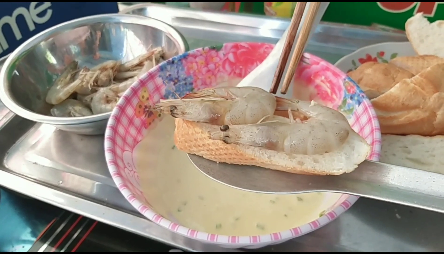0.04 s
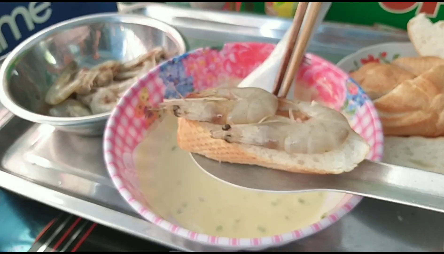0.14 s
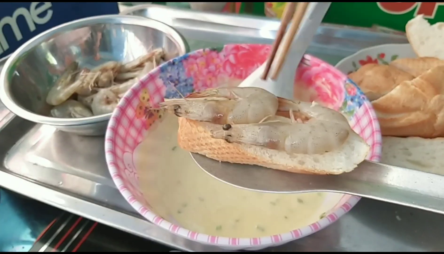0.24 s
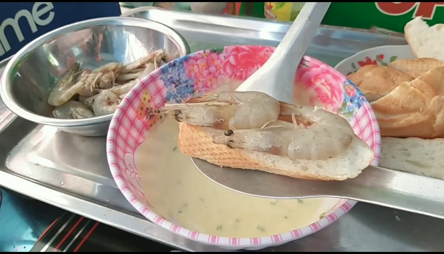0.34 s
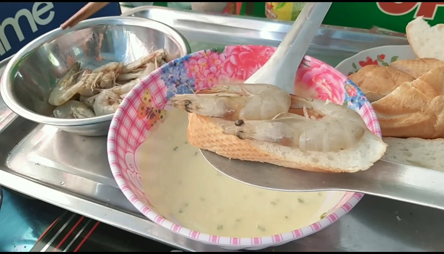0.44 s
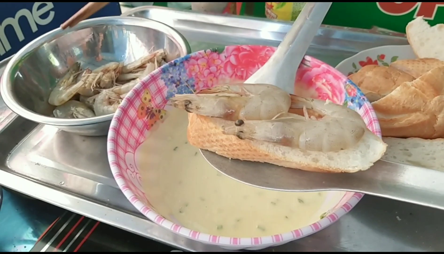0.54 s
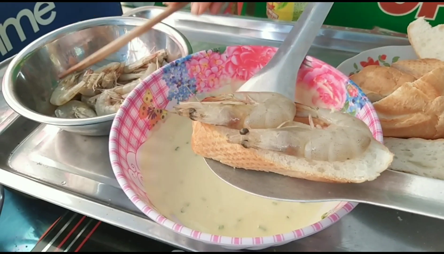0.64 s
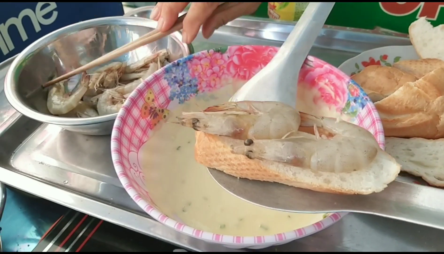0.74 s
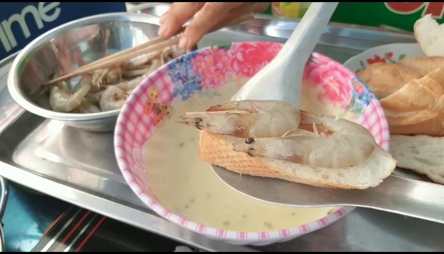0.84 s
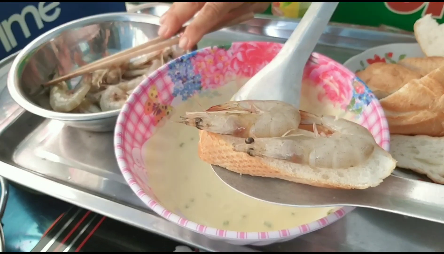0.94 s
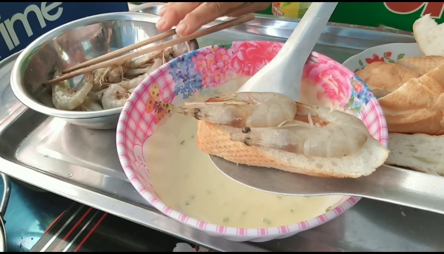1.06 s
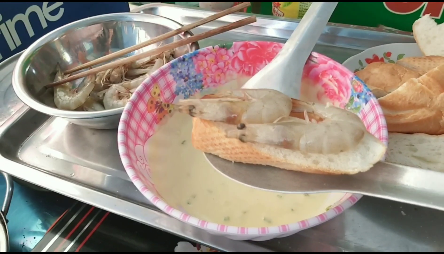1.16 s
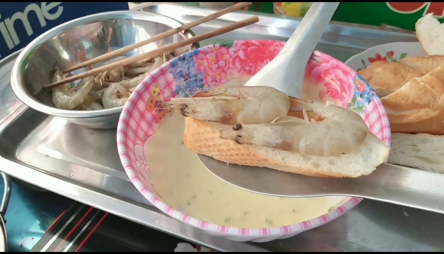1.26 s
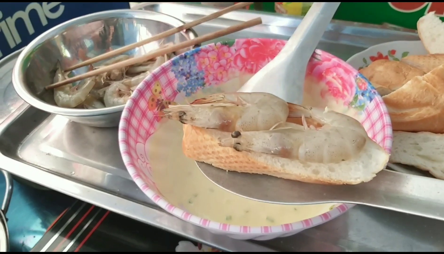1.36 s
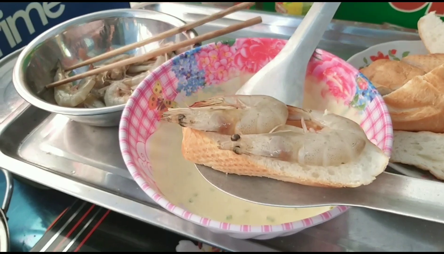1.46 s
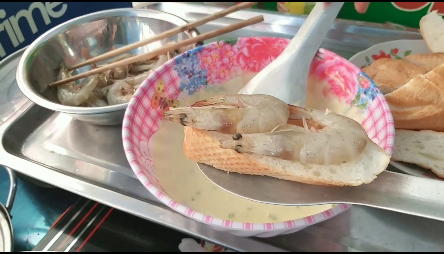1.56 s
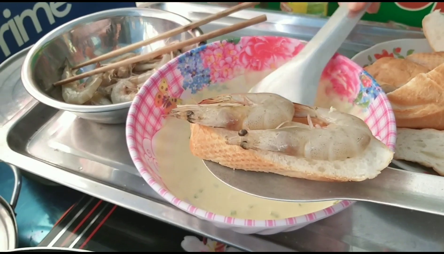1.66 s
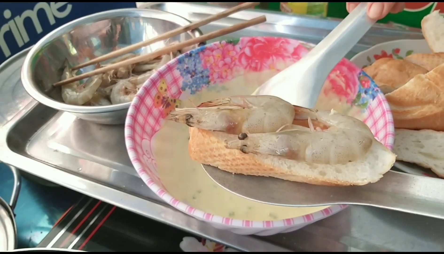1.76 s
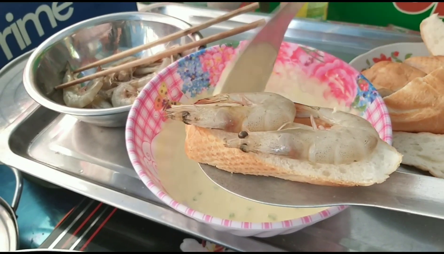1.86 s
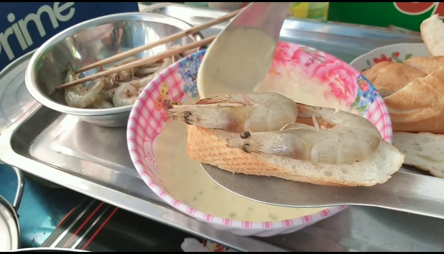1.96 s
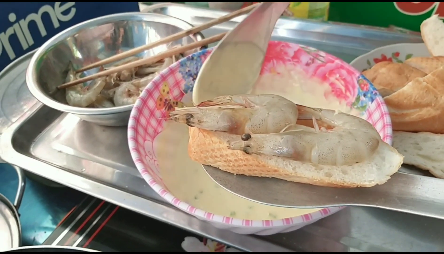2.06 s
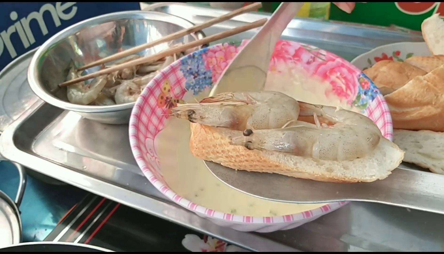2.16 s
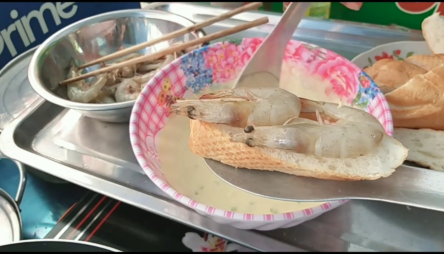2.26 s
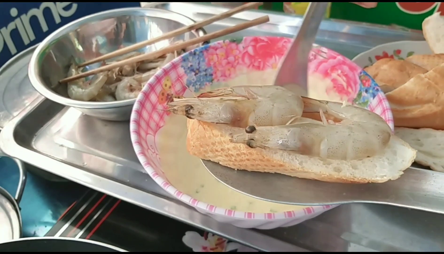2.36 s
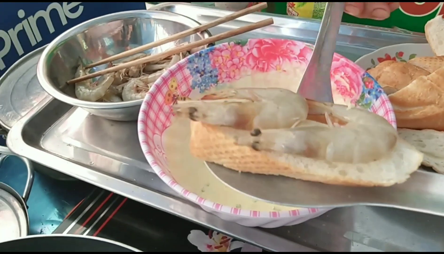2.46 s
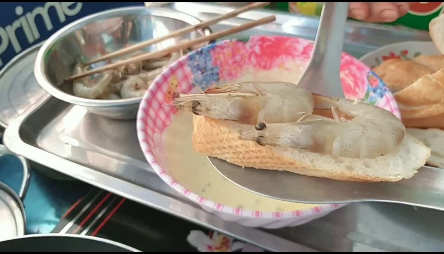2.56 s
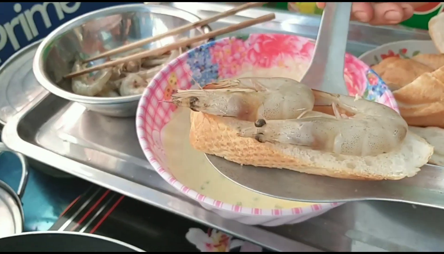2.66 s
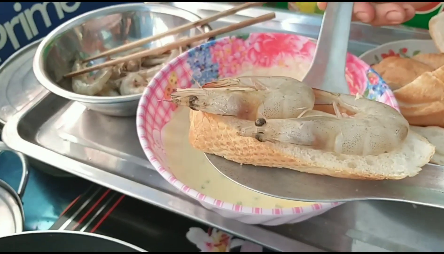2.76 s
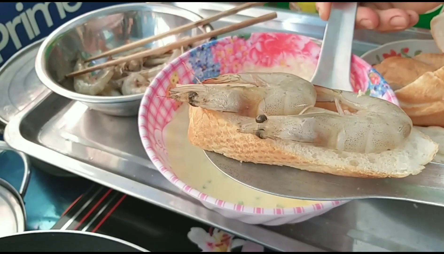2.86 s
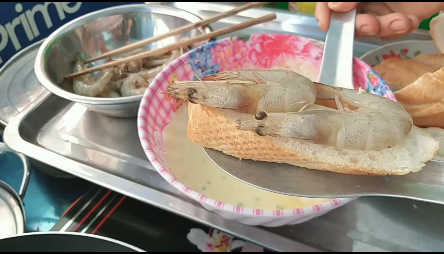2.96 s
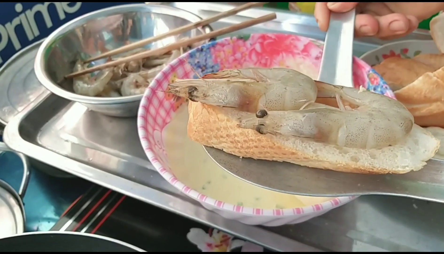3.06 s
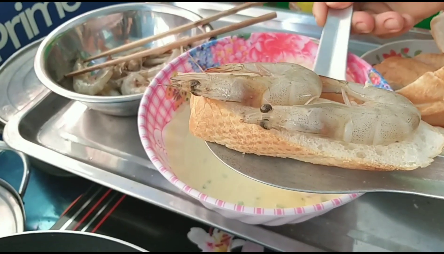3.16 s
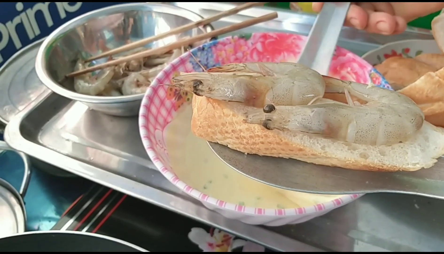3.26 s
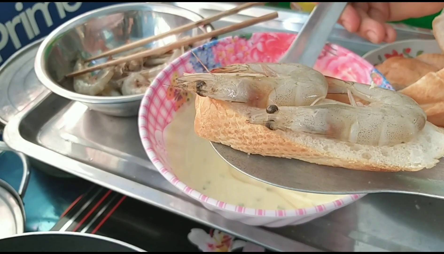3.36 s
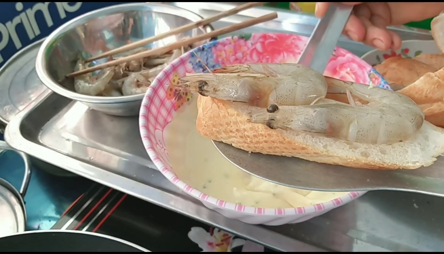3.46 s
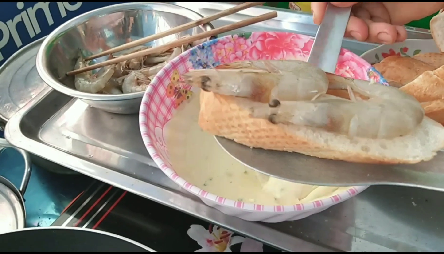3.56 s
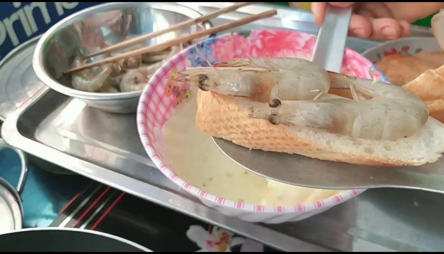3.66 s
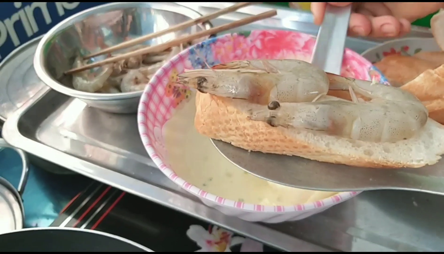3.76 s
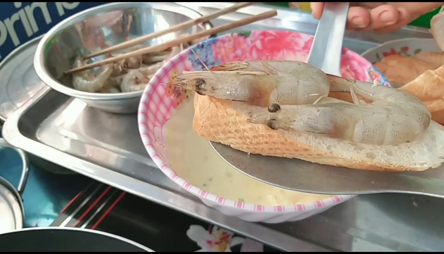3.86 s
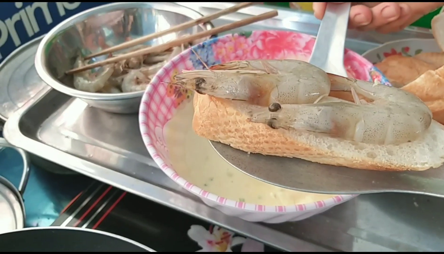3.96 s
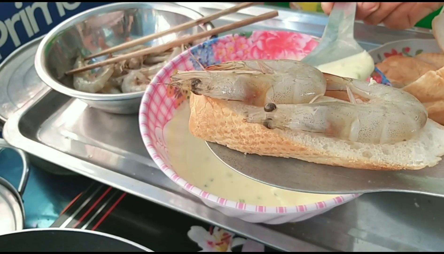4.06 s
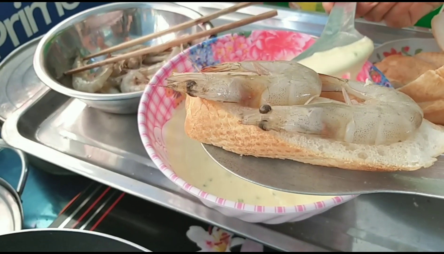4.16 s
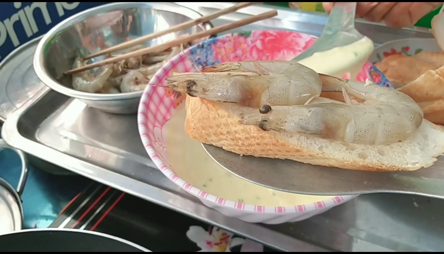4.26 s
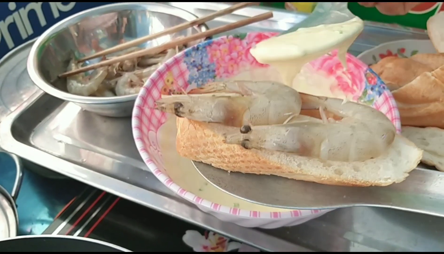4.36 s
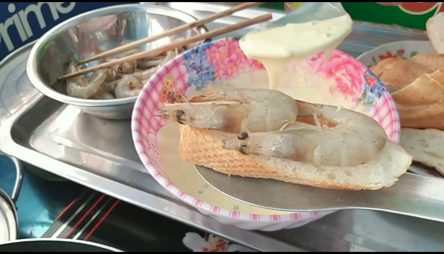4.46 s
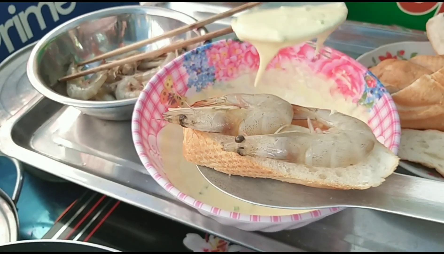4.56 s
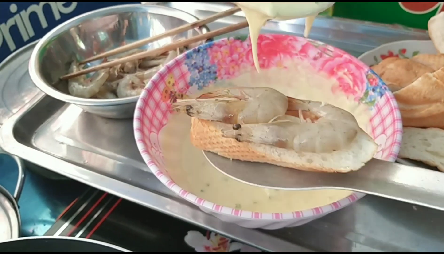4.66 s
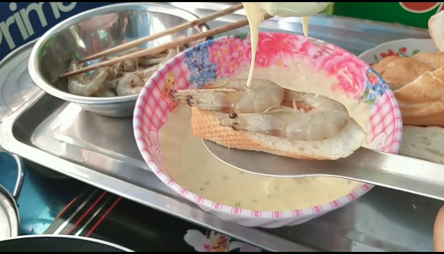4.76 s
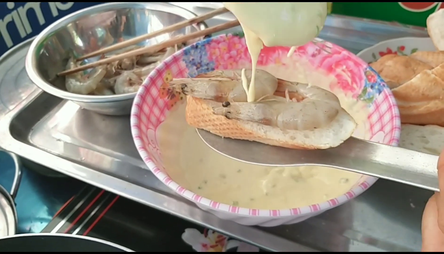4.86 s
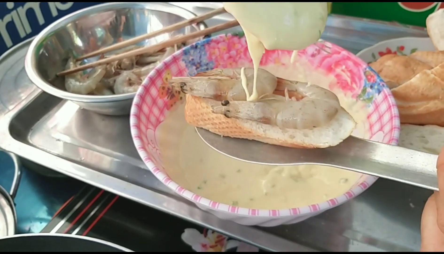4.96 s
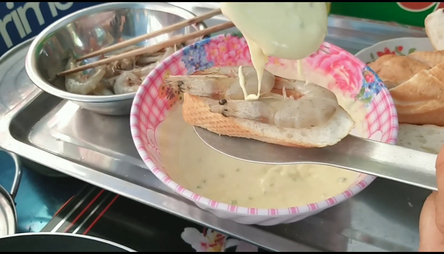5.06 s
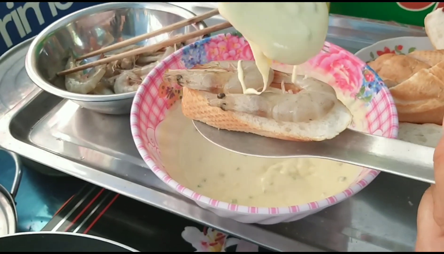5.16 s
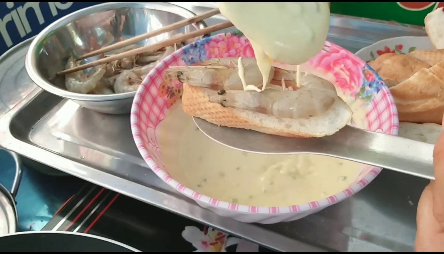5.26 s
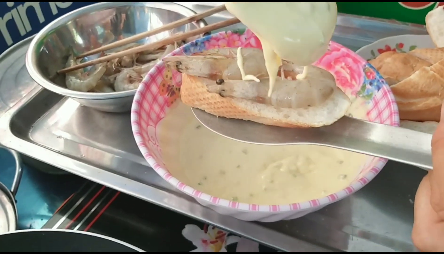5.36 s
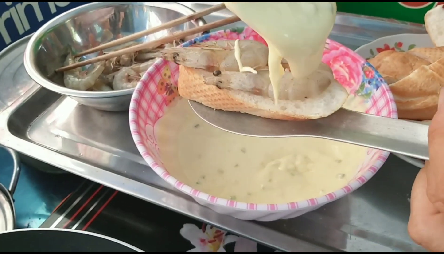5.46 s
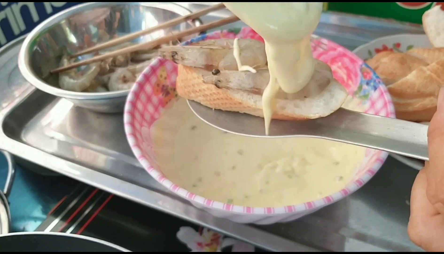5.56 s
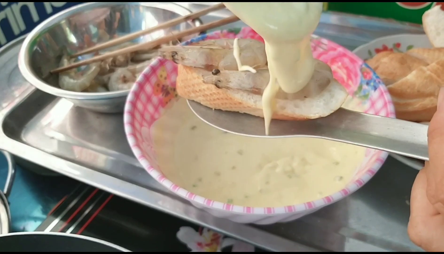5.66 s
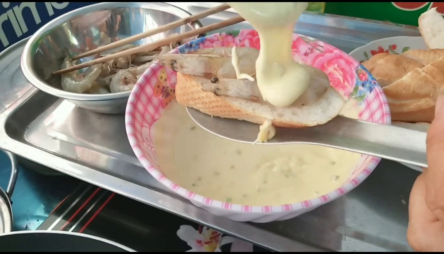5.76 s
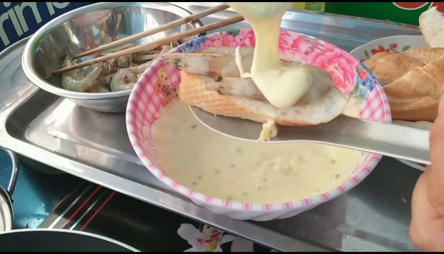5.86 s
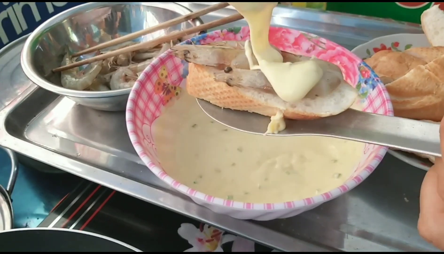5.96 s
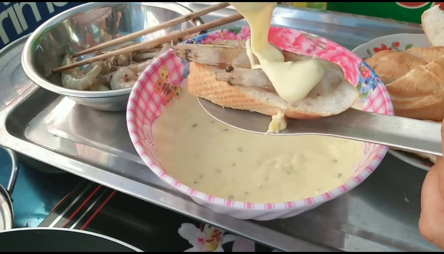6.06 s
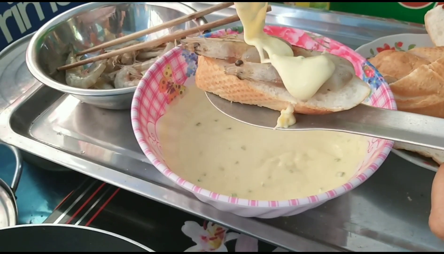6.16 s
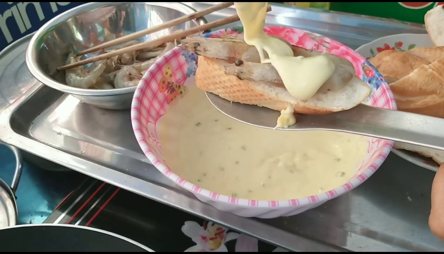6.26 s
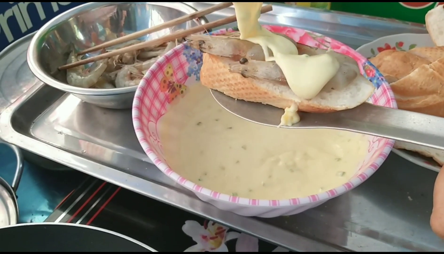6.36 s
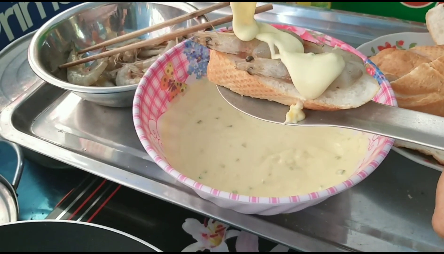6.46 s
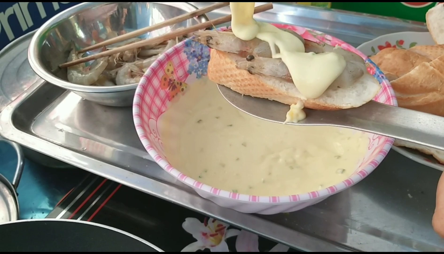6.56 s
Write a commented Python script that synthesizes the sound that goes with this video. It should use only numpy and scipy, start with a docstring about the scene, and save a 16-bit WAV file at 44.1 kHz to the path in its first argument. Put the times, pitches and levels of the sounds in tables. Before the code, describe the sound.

Close, dry kitchen sounds with short wall reflections: soft stirring rustle, a cluster of muffled spoon taps, then the brightest event, chopsticks clattering onto a thin metal bowl. A short scrape and hollow plop follow, then a strong knock midway, snappy ticks and lighter scraping taps. Handling fades near the end into hum, steady high insect whine and faint hoarse chirps far away.

```python
"""Cooking in a small room: a wavering low hum, still air and two high bands of insect whine, all filtered noise or tone.
A spoon starts to stir thick batter (rumble and rustle noise), then scrapes and knocks its dish (damped resonances).
At about 1 s chopsticks bounce on a steel bowl (decaying modes and wooden clacks); the gain control ducks.
The spoon scrapes again (shaped noise), pulls out with a soft hollow note, and knocks, scrapes and ticks on.
From about 5 s something chirps faintly far off, in narrow swells of noise."""
import sys
import numpy as np
from scipy import signal
from scipy.fft import rfft, irfft, next_fast_len
from scipy.io import wavfile
from scipy.ndimage import uniform_filter1d, minimum_filter1d, map_coordinates

SR = 44100
rng = np.random.default_rng(int(sys.argv[2]) if len(sys.argv) > 2 else 0)


def pcm_store(signal):
    """Save signal as 16-bit PCM."""
    levels = np.round(np.clip(np.atleast_2d(signal), -1, 1) * 32767)
    wavfile.write(sys.argv[1], SR, levels.astype(np.int16).T)


N = 291456


def amp(db):
    """Decibels to a linear amplitude."""
    return 10 ** (np.asarray(db) / 20)


def unit(x):
    """x scaled to rms 1."""
    return x / np.sqrt(np.mean(x ** 2) + 1e-20)


def along(points, hz):
    """Read a curve of (Hz, value) points on a log frequency axis."""
    point_hz, value = np.transpose(points)
    return np.interp(np.log(hz + 1), np.log(point_hz + 1), value)


def filtered(x, response):
    """x times a complex response of frequency."""
    size = next_fast_len(len(x) + SR // 4)
    hz = np.fft.rfftfreq(size, 1 / SR)
    return irfft(rfft(x, size) * response(hz), size)[:len(x)]


def coloured(x, spectrum):
    """x through a (Hz, dB) spectrum, at rms 1."""
    return unit(filtered(x, lambda f: amp(along(spectrum, f))))


def noise(spectrum, size=N):
    """Random noise with a (Hz, dB) spectrum, at rms 1."""
    return coloured(rng.standard_normal(size), spectrum)


def band(hz, width_hz):
    """Noise in one resonance, at rms 1."""
    return unit(filtered(rng.standard_normal(N), lambda f: 1 / (1 + ((f - hz) / (0.74 * width_hz)) ** 2)))


def wobble(rate, size=N):
    """A smooth random curve, rate knots a second."""
    knots = rng.standard_normal(int(size * rate / SR) + 4)
    return map_coordinates(knots, [np.arange(size) * rate / SR])


def decay(t, t60):
    """Silent before t = 0, then dying by 60 dB in t60."""
    return (t >= 0) * np.exp(-np.log(1000) * np.maximum(t, 0) / t60)


def add(track, s, sound):
    """Mix sound into track from s seconds on."""
    start = round(s * SR)
    track[start:start + len(sound)] += sound[:N - start]


def off_wall(x, delay, strength):
    """x with one reflection, which ripples its spectrum."""
    return filtered(x, lambda f: 1 + strength * np.exp(-2j * np.pi * f * delay)) / np.hypot(1, strength)


def room(x, wet_db):
    """x with a fresh tail from the nearby walls; the treble dies first."""
    hz, t, grains = signal.stft(rng.standard_normal(SR // 2), SR, nperseg=256)
    t60 = along([(150, 0.32), (1000, 0.28), (3000, 0.21), (10000, 0.15)], hz)[:, None]
    build_up = 1 - np.exp(-t / 0.0013)
    tail = signal.istft(grains * decay(t, t60) * build_up, SR, nperseg=256)[1]
    tail = tail / np.linalg.norm(tail)
    tone = [(120, 6.0), (400, 5), (1200, -6.0), (5000, -3.5)]
    tail = filtered(tail, lambda f: amp(along(tone, f)))
    return x + amp(wet_db) * signal.fftconvolve(x, tail)[:len(x)]


# spectrum of the still air: hz [Hz], relative_density_db [dB per Hz]
AIR_SPECTRUM = [(300, -0.5), (650, -4.5), (920, 6.5), (1220, -10), (1580, 12), (1950, -11), (3000, -5),
                (4600, 6), (6800, -12.5), (8700, -8), (9600, 5), (12200, -1), (13800, 7.5), (16000, 2.5)]
# swell of the low hum, before its trim and wavering: time_s [s], level_db [dB]
HUM_SWELL = [(0.0, -59.5), (0.35, -61), (0.53, -70), (0.6, -65), (1.52, -78.5), (2.54, -76), (2.59, -63),
             (3.58, -72), (3.84, -62), (4.98, -59.5), (5.16, -65), (6.6, -59)]
HUM_HZ, HUM_TRIM_DB, AIR_DB = 75.5, 2, -57.5


def surroundings():
    """A low tone wavering in pitch and level, and still air as noise with one reflection."""
    hum_db = np.interp(np.arange(N) / SR, *np.transpose(HUM_SWELL)) + HUM_TRIM_DB
    hum = np.sin(2 * np.pi * np.cumsum(HUM_HZ + 1.9 * wobble(3.3)) / SR)
    air = off_wall(noise(AIR_SPECTRUM), delay=0.003, strength=0.22)
    return amp(hum_db + 1.3 * wobble(4.4)) * hum + amp(AIR_DB) * air


# the insects' bands, before flicker: pitch_hz [Hz], width_hz [Hz], level_db [dB]
INSECT_BANDS = [(5250, 270, -62.5), (5606, 260, -56.5), (10300, 220, -66), (10726, 250, -57),
                (11010, 400, -58.5)]


def insects():
    """A steady far chorus of narrow noise: a shrill band and about its octave, slightly restless."""
    chorus = sum(amp(db + .7 * wobble(14)) * band(hz, width) for hz, width, db in INSECT_BANDS)
    return off_wall(chorus * amp(0.2 * wobble(2.3)), delay=.0039, strength=0.2)


# faint far chirps, before the mix of core and smear: centre_s [s], pitch_hz [Hz], level_db [dB]
FAR_CHIRPS = [(5.2, 3150, -62.5), (5.467, 3180, -57.5), (5.67, 3200, -59.5), (5.752, 4110, -55.5),
              (5.945, 3050, -60), (5.937, 4000, -60.5), (6.204, 3100, -59), (6.57, 4210, -56)]
CHIRP_S = 0.089  # from the centre to where the swell has fallen by 17 dB


def chirps():
    """Faint hoarse chirps: a narrow core in a wider smear, swelling and fading."""
    t = np.arange(N) / SR
    out = np.zeros(N)
    for s, hz, db in FAR_CHIRPS:
        swell = np.exp(-2 * ((t - s) / CHIRP_S) ** 2)
        voice = 0.72 * band(hz, width_hz=110) + 0.58 * band(hz, width_hz=900)
        out += amp(db) * swell * voice
    return out


# spectrum of the stirring's rumble: hz [Hz], relative_density_db [dB per Hz]
RUMBLE_SPECTRUM = [(20, -26), (50, -17), (75, -6.5), (100, -2), (135, 2.5), (220, -0.5), (320, -7.5),
                   (500, -19), (1000, -32.5)]
# spectrum of the stirring's rustle: hz [Hz], relative_density_db [dB per Hz]
RUSTLE_SPECTRUM = [(200, -14), (500, -8), (1400, -3.5), (2100, 0), (3200, 3.5), (4500, 4), (7000, -7),
                   (10000, -11.5), (16000, -2)]
# slow moves of hand and spoon, levels before flicker:
# start_s [s], length_s [s], rumble_db [dB], rustle_db [dB]
STIR_MOVES = [(0.472, 1.4, -61, -59.5), (2.348, 1.3, -57.5, -55.5), (3.947, 0.41, -59, -55.5),
              (4.427, 0.13, -49, -62.5)]
STIR_RISE_S, STIR_T60_S, REST_RUMBLE_DB = 0.23, 1.8, -62
# from 2 s the faint resting rustle grows louder, and stays so
RUSTLE_RISE_S, RUSTLE_BEFORE_DB, RUSTLE_AFTER_DB = 2, -64.5, -59


def stirring():
    """Each slow move swells, holds and dies away, as a low rumble and a soft rustle over their resting levels."""
    t = np.arange(N) / SR
    rumble_power = amp(REST_RUMBLE_DB) ** 2
    rise_times = [RUSTLE_RISE_S, RUSTLE_RISE_S + STIR_RISE_S]
    rest_rustle_db = np.interp(t, rise_times, [RUSTLE_BEFORE_DB, RUSTLE_AFTER_DB])
    rustle_power = amp(rest_rustle_db) ** 2
    for s, length, rumble_db, rustle_db in STIR_MOVES:
        rise = np.clip((t - s) / STIR_RISE_S, 0, 1)
        effort = rise * decay(np.maximum(t - s - length, 0), STIR_T60_S)
        rumble_power = rumble_power + (amp(rumble_db) * effort) ** 2
        rustle_power = rustle_power + (amp(rustle_db) * effort) ** 2
    rumble = amp(wobble(7.6)) * noise(RUMBLE_SPECTRUM)
    grainy = rng.standard_normal(N) * amp(2.7 * wobble(820))
    rustle = amp(wobble(14)) * coloured(grainy, RUSTLE_SPECTRUM)
    return np.sqrt(rumble_power) * rumble + np.sqrt(rustle_power) * rustle


# the hollow that the lifted spoon leaves in the batter rings briefly
HOLLOW_S, HOLLOW_HZ, HOLLOW_DB, HOLLOW_T60_S = 1.77, 650, -45, 0.22


def hollow():
    """One soft, quickly dying note as the spoon pulls out of the batter."""
    t = np.arange(N) / SR - HOLLOW_S
    onset = np.clip(t / 0.0063, 0, 1)
    return amp(HOLLOW_DB) * onset * decay(t, HOLLOW_T60_S) * np.sin(2 * np.pi * HOLLOW_HZ * t)


# tiny sharp ticks: start_s [s], level_db [dB], pitch_hz [Hz]
SHARP_TICKS = [(2.3763, -28.5, 13000), (2.885, -20.5, 13170), (2.889, -25, 11900), (2.996, -31.5, 11100)]


def ticks():
    """Pinpoint snaps: very high tones that die by 60 dB in 4 ms, with a room tail."""
    out, t = np.zeros(N), np.arange(SR // 4) / SR
    for s, db, hz in SHARP_TICKS:
        snap = amp(db) * decay(t, 0.004) * np.sin(2 * np.pi * hz * t)
        add(out, s, room(snap, wet_db=-7))
    return out


# the spoon's scrapes, levels before the stroke's envelope:
# start_s [s], rise_s [s], t60_s [s], body_db [dB], edge_db [dB], hiss_db [dB]
SPOON_SCRAPES = [(.789, .011, 0.39, -52.5, -50.5, -41), (1.636, .012, 0.4, -61, -65, -69),
                 (1.703, .052, .11, -32, -37.5, -46.5), (2.331, .0086, 0.19, -67, -40.5, -47),
                 (2.85, .021, 1, -51, -78, -69.5), (2.8837, .002, 0.21, -54.5, -41, -37.5),
                 (2.991, .0028, .11, -65, -46.5, -43), (3.122, .028, .1, -42.5, -48, -63),
                 (3.404, .023, 0.28, -43, -44, -41.5), (3.509, .013, .11, -53, -51, -43.5),
                 (3.832, .02, 0.14, -51, -52, -63), (4.237, .016, 0.3, -55, -42.5, -40),
                 (5.034, .002, .22, -66.5, -44, -52.5), (5.141, .025, .5, -63, -52.5, -56)]
# what a scrape excites in the dish's body: hz [Hz], relative_density_db [dB per Hz]
BODY_SPECTRUM = [(80, -30), (250, -21.5), (650, -6.5), (900, -3), (1300, 1.5), (1900, 0), (2500, -2.5),
                 (3300, -4), (4500, -19), (9000, -45.5)]
# what it excites in the spoon's edge: hz [Hz], relative_density_db [dB per Hz]
EDGE_SPECTRUM = [(900, -37.5), (2000, -12), (3200, -4.5), (3800, -2), (4400, 3), (5300, -2.5),
                 (7000, -15.5), (12000, -37.5)]
# its fine hiss: hz [Hz], relative_density_db [dB per Hz]
HISS_SPECTRUM = [(3000, -30), (6000, -3.5), (8000, -0.5), (10000, 3), (13000, 4.5), (16000, 0)]
# the spoon's two squealing modes, louder with a harder edge: pitch_hz [Hz], level_over_edge_db [dB]
SQUEAL_MODES = [(3300, -17), (4410, -10)]


def scrapes():
    """Dense uneven slips swell and fade, sounding the dish's body, the spoon's edge, a fine hiss and a narrow squeal."""
    out, t = np.zeros(N), np.arange(SR // 2) / SR
    for s, rise, t60, body_db, edge_db, hiss_db in SPOON_SCRAPES:
        stroke = np.minimum(t / rise, 1) ** 2 * decay(np.maximum(t - rise, 0), t60)
        slips = rng.standard_normal(len(t)) * amp(1.3 * wobble(700, size=len(t)))
        squeal = np.zeros(len(t))
        for hz, db in SQUEAL_MODES:
            mode = filtered(slips, lambda f: 1j * f / (hz ** 2 - f * f + 1j * f * hz / 35))
            squeal += amp(db) * unit(mode)
        body = amp(body_db) * coloured(slips, BODY_SPECTRUM)
        edge = amp(edge_db) * (coloured(slips, EDGE_SPECTRUM) + squeal)
        hiss = amp(hiss_db) * coloured(slips, HISS_SPECTRUM)
        add(out, s, room(stroke * (body + edge + hiss), wet_db=-5))
    return out


# the spoon knocking in the batter dish: start_s [s], level_db [dB], pitch_factor [ratio],
# contact_cutoff_hz [Hz], room_db [dB], handle_hz [Hz], handle_db [dB against the knock's peak]
SPOON_KNOCKS = [(0.7955, -31, 1.14, 2157, 11, 1790, -16), (0.8264, -22.5, 0.82, 2024, -8, 1340, -2.5),
                (0.8284, -25, 1, 2190, -8, 1940, -2.5), (0.8339, -23, 1.02, 2906, 2, 1850, 0.5),
                (0.8369, -22.5, 1, 2358, -4.5, 1168, -13), (2.2645, -18, 1.0, 2250, -1.5, 2120, -7),
                (2.5543, -4.5, 0.99, 4120, -2.5, 3790, -16.5), (2.976, -41, 1.9, 14000, -8, 3160, -1),
                (3.1115, -28.5, 0.99, 3570, 2.5, 2360, -2.5), (3.221, -31, 0.894, 3400, -0.5, 2280, -2.5),
                (3.4895, -24.5, 1.12, 12140, -7, 1370, -15), (3.603, -24, 1.047, 3180, 1.5, 1556, -3.5),
                (3.807, -32.5, .96, 7140, -0.5, 2414, 3.5), (4.059, -42.5, 1.01, 4020, 9, 2340, -2.5),
                (4.0908, -37, 0.79, 5500, -1, 1036, -27)]
# the batter-damped dish on its tray, before the pitch factor: mode_hz [Hz], width_hz [Hz], level_db [dB]
DISH_MODES = [(113, 21, -11.5), (321, 41, -5), (445, 130, -11.5), (800, 160, 0), (1028, 190, -0.5),
              (1307, 200, 4.5), (1580, 190, 1), (1810, 260, -8.5), (2050, 370, -9), (2600, 370, -2.5),
              (3920, 260, -6), (4880, 880, -6), (5975, 660, -10), (7340, 500, -16.5), (12300, 3700, -25.5)]


def knocks():
    """A short push rings the dish for a few cycles; the spoon's handle rings on at a pitch set by the grip."""
    out, t = np.zeros(N), np.arange(SR // 2) / SR
    for s, db, pitch, cut_hz, wet_db, handle_hz, handle_db in SPOON_KNOCKS:

        def dish(f):
            """The modes side by side, alternating in sign."""
            return sum((-1) ** k * amp(level) * 1j * f * w / ((pitch * hz) ** 2 - f * f + 1j * f * w)
                       for k, (hz, w, level) in enumerate(DISH_MODES))

        def contact(f):
            """Soft contacts are duller, and the small dish radiates no deep bass."""
            return (1j * f / (55 + 1j * f)) ** 2 / (1 + 1j * f / cut_hz) ** 2

        # the spoon chatters for a few milliseconds as it lands, which spreads the treble
        chatter = rng.standard_normal(len(t)) * decay(t, .022)
        chatter = filtered(chatter, lambda f: (1j * f / (1800 + 1j * f)) ** 2)
        push = signal.unit_impulse(len(t)) + .08 * chatter
        knock = filtered(push, lambda f: dish(f) * contact(f))
        knock = knock / np.abs(knock).max()
        handle = amp(handle_db) * decay(t, .022) * np.sin(2 * np.pi * handle_hz * t)
        add(out, s, room(amp(db) * (knock + handle), wet_db))
    return out


# chopsticks bouncing on the steel bowl: start_s [s], ring_db [dB], clack_db [dB],
# favoured_hz [Hz, set by the contact point], ring_length_factor [ratio]
STICK_BOUNCES = [(1.02, 2.5, -14, 2700, 0.35), (1.0255, 0, -13.5, 3500, 0.44),
                 (1.0467, -3, -13.5, 3920, 0.84), (1.059, -5, -17, 1850, 0.23),
                 (1.1164, -4.5, -20, 2750, 0.16)]
# the steel bowl's modes, before each bounce's factors: mode_hz [Hz], level_db [dB], t60_s [s],
# rest_change_db [dB, once the sticks lie on the rim]
BOWL_MODES = [(406, -27.5, .3, 3), (881, -24, .3, 1.5), (1190, -20, .25, 3), (1364, -22, 0.23, -5),
              (1680, -14.5, .25, -4), (1795, -8, .41, -5), (1857, -6.5, .25, 13), (1921, -6.5, .19, -12),
              (2022, -13.5, .25, -12), (2440, -15, .2, 3), (2680, -6.5, .51, 3), (2770, -15.5, .25, 4),
              (3161, -18, .4, 11.5), (3793, 0.5, .49, -12.5), (3845, -17, .3, -6), (4360, -15, .55, 11.5),
              (4760, -21, 0.65, 1), (4787, -19.5, .65, 7), (5580, -29.5, .64, -5), (5561, -31.5, .65, 12),
              (5895, -20.5, 0.77, 1.5), (6217, -30, .76, 8.5), (6790, -26.5, .35, -3), (7400, -40, .8, 8),
              (8030, -33, .8, 4.5), (8144, -21, .42, -15), (8540, -17, .3, -10), (9709, -16.5, 0.22, -10),
              (10270, -24, .3, -6), (10500, -27, .4, 1.5)]
# spectrum of wooden sticks and tray together: hz [Hz], relative_density_db [dB per Hz]
CLACK_SPECTRUM = [(30, -71.5), (100, -17.5), (200, -17.5), (380, -6), (560, -19.5), (800, -6), (1050, -16),
                  (1900, -3.5), (2600, -6), (3300, -11.5), (4500, -4.5), (7200, -23.5), (8600, -12.5),
                  (12000, -16), (16000, -32)]


def clink():
    """Each bounce feeds the bowl's modes; the last leaves the sticks on the rim, which shifts energy between them."""
    t = np.arange(SR) / SR
    first, last = STICK_BOUNCES[0][0], STICK_BOUNCES[-1][0]
    resting = 1 - decay(np.maximum(t + first - last, 0), 0.045)
    sound = np.zeros(SR)
    for hz, db, t60, rest_db in BOWL_MODES:
        energy = np.zeros(SR)
        for s, ring_db, _, favoured_hz, length in STICK_BOUNCES:
            # modes far from the favoured pitch lose up to 14 dB
            off_pitch_db = 14 * abs(np.tanh(2 * np.log2(hz / favoured_hz)))
            energy += (amp(ring_db - off_pitch_db) * decay(t + first - s, length * t60)) ** 2
        # all modes start together, so close pairs beat; each wavers a little at random in phase and level
        phase = 2 * np.pi * hz * t + .15 * wobble(45, size=SR)
        waver_db = 1.5 * wobble(40, size=SR)
        sound += amp(db + rest_db * resting + waver_db) * np.sqrt(energy) * np.sin(phase)
    sound *= 1 - np.exp(-t / 0.0011)
    for s, _, clack_db, _, _ in STICK_BOUNCES:
        age = t + first - s
        crack = decay(age, 0.056) * noise(CLACK_SPECTRUM, size=SR)
        chatter = amp(3.5 * wobble(250, size=SR))
        dull_wood = filtered(noise(CLACK_SPECTRUM, size=SR), lambda f: 1 / (1 + 1j * f / 7000))
        rattle = decay(age, 0.42) * chatter * dull_wood
        sound += amp(clack_db) * (crack + amp(-12) * rattle)
    out = np.zeros(N)
    add(out, first, sound)
    return filtered(out, lambda f: (1j * f / (70 + 1j * f)) ** 3)  # too small to radiate deep bass


def scene():
    """All layers together, from the background to the chopsticks."""
    background = surroundings() + insects() + chirps()
    spoon = stirring() + hollow() + ticks() + scrapes() + knocks()
    return (background + spoon + clink())[None]


def gain_control(x, ceiling_db, hold, release_db):
    """The gain drops at once under a loud sound, holds, then climbs back by release_db a second."""
    level_db = 10 * np.log10(np.abs(uniform_filter1d(x ** 2, size=SR // 50)) + 1e-12)
    span = 2 * int(hold * SR / 2) + 1
    # the filter's shifted origin looks back, so each drop lasts for the hold time
    held = minimum_filter1d(np.minimum(ceiling_db - level_db, 0), span, origin=span // 2, mode="constant")
    climb = release_db * np.arange(N) / SR
    return x * amp(np.minimum.accumulate(held - climb) + climb)


TOP_HZ = 15650  # nothing passes from here up


def record(dry):
    """Gain control, softly rounded peaks and the band limits at both ends."""
    x = gain_control(dry[0], ceiling_db=-8.5, hold=1.273, release_db=22.5)
    x = x / (1 + np.abs(x / .9) ** 6) ** (1 / 6)
    return filtered(x, lambda f: (f < TOP_HZ) * (1j * f / (14 + 1j * f)) ** 2)[None]


dry = scene()
out = record(dry)
pcm_store(out)
```